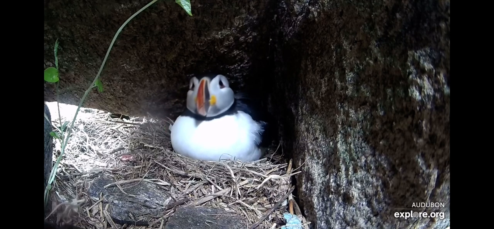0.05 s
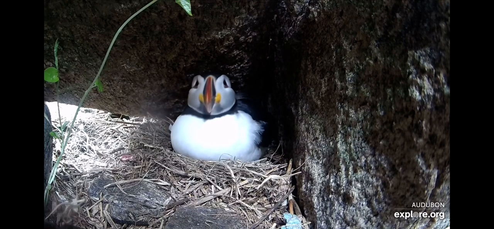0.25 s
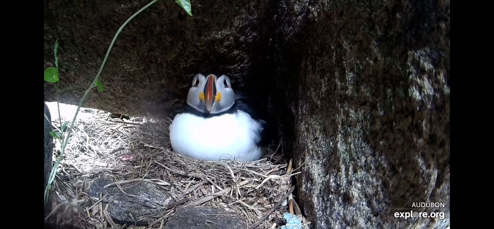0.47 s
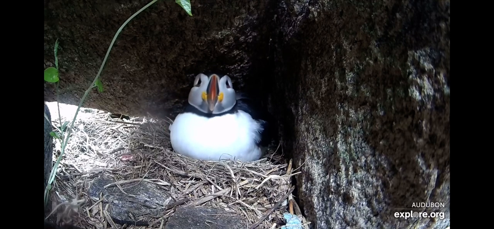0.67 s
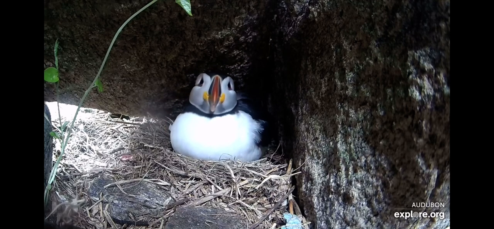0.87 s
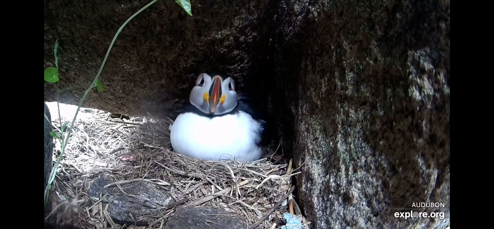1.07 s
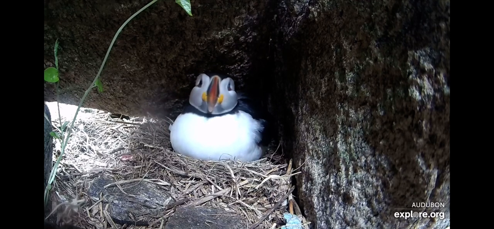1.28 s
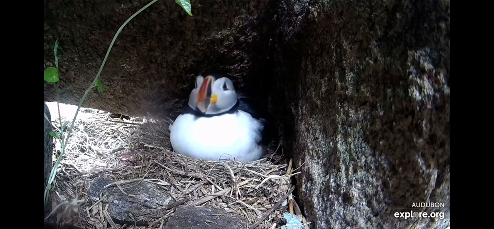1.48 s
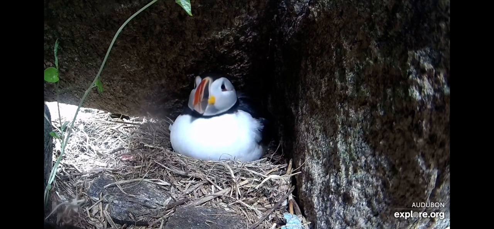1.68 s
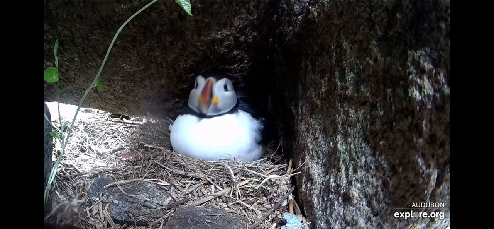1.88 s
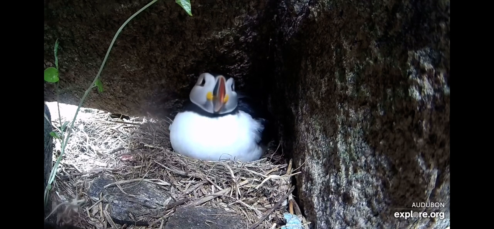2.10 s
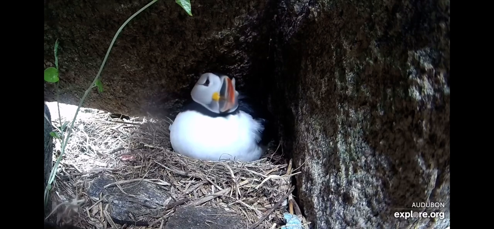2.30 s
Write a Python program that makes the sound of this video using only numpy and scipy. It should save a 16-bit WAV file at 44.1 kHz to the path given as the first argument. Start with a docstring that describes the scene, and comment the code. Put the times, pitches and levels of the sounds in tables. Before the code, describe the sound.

Harsh seabird calls, a whistle, a sinking rattle and falling rasps, over a faint distant colony.

```python
"""Seabirds outside a rock burrow

Seabirds, probably terns, call near the microphone: a clear arched whistle, a rattle that sinks in
pitch and a loud falling rasp, with fainter rasps further off. Each is a syrinx tone shaped by throat
and beak, plus air noise. Three distant rising peeps and a few soft thuds come in between. The rock
adds faint echoes and rings near 2.5 kHz; a distant colony and a low rumble lie underneath."""
import sys
import numpy as np
from scipy import signal
from scipy.fft import rfft, irfft, next_fast_len
from scipy.io import wavfile

SR = 44100
rng = np.random.default_rng(int(sys.argv[2]) if len(sys.argv) > 2 else 0)


def persist_wave(psi):
    """Save psi, clipped to +-1, as 16-bit WAV."""
    counts = np.round(np.clip(psi, -1, 1) * 32767).astype(np.int16)
    wavfile.write(sys.argv[1], SR, np.atleast_2d(counts).T)


N = 108045
T = np.arange(N) / SR


def from_db(db):
    """Decibels to gain."""
    return 10 ** (np.asarray(db) / 20)


def rms_one(x):
    """Scale to rms 1."""
    return x / np.sqrt(np.mean(x ** 2) + 1e-20)


def gain_at(spectrum, hz):
    """Gain of a spectrum at given frequencies."""
    f, db = np.transpose(spectrum)
    return from_db(np.interp(np.log(np.maximum(hz, 1)), np.log(f), db))


def noise(spectrum):
    """Coloured noise of rms 1."""
    size = next_fast_len(N, True)
    gains = gain_at(spectrum, np.fft.rfftfreq(size, 1 / SR))
    return rms_one(irfft(rfft(rng.standard_normal(size)) * gains, size)[:N])


def drift(rate, size=N):
    """Smooth random wander of spread 1."""
    pole = np.exp(-16 * np.pi * rate / SR)
    white = rng.standard_normal(size // 8 + 2000)
    slow = rms_one(signal.lfilter([1], [1, -2 * pole, pole * pole], white)[500:])
    return np.interp(np.arange(size) / 8, np.arange(len(slow)), slow)


def ease(x):
    """Quarter sine from 0 to 1, then held."""
    return np.sin(np.pi / 2 * np.clip(x, 0, 1))


def gate(t, start, end, attack, release):
    """Rounded attack, hold and release."""
    return ease((t - start) / attack) ** 2 * ease((end - t) / release) ** 2


def contour(points):
    """Times, pitch and envelope of one call."""
    s, hz, db = np.transpose(points)
    t = T[(T > s[0]) & (T < s[-1])]
    edges = gate(t, s[0], s[-1], attack=.005, release=.005)
    return t, np.interp(t, s, hz), from_db(np.interp(t, s, db)) * edges


# Response of throat and beak: f/Hz, level/dB
THROAT_RESPONSE = [(1050, -9.5), (1250, -15.5), (1450, -4.5), (1620, -4), (2030, -6), (2500, 1.5),
                   (3100, -2.5), (3700, -10), (4130, 1.5), (4500, -10.5), (5100, -1), (5450, -4),
                   (6100, 1.5), (6800, -11.5), (7500, -27.5), (8400, -26), (9500, -16.5), (11000, -20.5),
                   (13200, -13.5)]
JITTER, SHIMMER = .042, .65   # fast spread of pitch and amplitude at roughness 1


def voice(t, pitch, envelope, harmonics_db, rough, air_db, tilt_db=0, bass_db=0):
    """An unsteady syrinx sounding through the throat. Rows: tone, air noise strength, send to the tail."""
    jitter, shimmer, waver, swell = (drift(rate, SR // 2)[:len(t)] for rate in (393, 200, 70, 70))
    unsteady = np.sqrt(min(abs(np.min(rough)) / .22, 1))
    pitch = pitch * (1 + unsteady * .008 * waver)
    envelope = envelope * from_db(unsteady * 1.1 * swell)
    phase = 2 * np.pi * np.cumsum(pitch * (1 + rough * JITTER * jitter)) / SR
    k = np.arange(len(harmonics_db))[:, None] + 1
    colour_db = tilt_db * np.log2(np.maximum(k / 2, 1)) + bass_db * (k == 1)
    gains = gain_at(THROAT_RESPONSE, k * pitch) * from_db(np.array(harmonics_db)[:, None] + colour_db)
    tone = np.sum(gains * np.sin(k * phase), axis=0) / np.sqrt(np.sum(gains ** 2, axis=0) / 2)
    tone = tone * envelope * (1 + rough * SHIMMER * shimmer) / np.hypot(1, rough * SHIMMER)
    air = from_db(air_db) * envelope * np.sqrt(abs(rough))
    send = tone / envelope.max() ** .3   # fainter calls are further off and wetter
    out = np.zeros((3, N))
    out[:, np.rint(t * SR).astype(int)] = tone, air, send
    return out


# Rasps, near and further off: flutter/Hz, flutter depth/share of pitch, roughness/0-1,
# overtone tilt/dB per octave, contour [t/s, f/Hz, level/dB]
RASP_CALLS = [ (118, 0.012, 0.7, -18.5, [(-.01, 1359, -10.5), (.02, 1289, -45), (.06, 1160, -40.5)]),
              (55.1, 0.005, 0.31, 12, [(.045, 1445, -50), (.1, 1590, -39), (.122, 1661, -29.5),
              (.175, 1666, -34.5), (.22, 1560, -31.5)]), (68.9, 0.024, 0.96, 2, [(.1, 1300, -39),
              (.19, 1392, -49), (.25, 1360, -46.5), (.277, 1250, -29.5), (.3, 1304, -43),
              (.35, 1320, -42)]), (64.6, 0.047, 0.49, -7, [(.35, 1405, -33.5), (.385, 1439, -24),
              (.42, 1382, -19), (.44, 1238, -21), (.468, 1315, -21), (.495, 1284, -33)]),
              (52, 0.04, 0.5, -5, [(.97, 1395, -44.5), (1.03, 1295, -58.5), (1.05, 1227, -52),
              (1.105, 1245, -49.5), (1.125, 1140, -63), (1.15, 1018, -50), (1.19, 965, -63)]),
              (76.1, 0.0075, 0.48, 3, [(1.205, 1268, -55.5), (1.232, 1245, -53.5), (1.268, 1459, -42),
              (1.3, 1445, -47.5), (1.36, 1376, -53), (1.42, 1328, -45), (1.49, 1324, -59)]),
              (72.8, 0.0033, 0.63, 1, [(1.368, 1353, -41), (1.389, 1296, -48), (1.398, 1275, -30.5),
              (1.425, 1163, -50.5), (1.495, 1026, -45.5), (1.525, 1000, -59)]),
              (57, .02, 0.36, 11, [(1.515, 1338, -50), (1.55, 1428, -42.5), (1.565, 1442, -68),
              (1.59, 1379, -53), (1.63, 1245, -50), (1.665, 898, -53.5)]),
              (58.52, 0.024, 0.43, -0.5, [(1.772, 1414, -49.5), (1.786, 1538, -30.5), (1.82, 1643, -29.5),
              (1.875, 1660, -32), (1.925, 1674, -28.5), (1.975, 1575, -21), (2.005, 1433, -20),
              (2.022, 1286, -25.5)]), (56.6, 0.02, 0.48, -15, [(2.016, 1284, -23), (2.036, 1244, -21.5),
              (2.047, 1218, -27.5), (2.075, 1197, -22), (2.105, 1174, -29), (2.14, 1194, -20.5),
              (2.153, 1207, -45), (2.174, 1240, -26.5), (2.195, 1067, -42), (2.24, 1029, -40.5),
              (2.32, 948, -66.5)]), (59.05, 0.036, 0.57, -8.5, [(2.02, 1420, -31), (2.12, 1333, -30),
              (2.146, 1542, -55), (2.154, 1547, -19.5), (2.163, 1555, -38), (2.19, 1550, -48)]),
              (64, 0.027, 0.43, -2, [(2.275, 1190, -54), (2.295, 1303, -48), (2.315, 1300, -78),
              (2.385, 1338, -85), (2.398, 1370, -54.5), (2.45, 1324, -79.5)]), ]
# Their harmonics, fundamental first: level/dB
RASP_HARMONICS_DB = [-1, 4, -13.5, -27]


def rasps():
    """Harsh calls that flutter in little arches, each higher, louder and brighter at its top."""
    out = 0
    for rate, depth, rough, tilt_db, points in RASP_CALLS:
        t, pitch, envelope = contour(points)
        flutter_hz = rate * (1 + .2 * drift(24, SR // 2)[:len(t)])
        arch = abs(np.sin(np.pi * np.cumsum(flutter_hz) / SR))
        flutter = np.pi * arch - 2   # centred on zero
        throb = np.exp(.24 * (1300 / pitch) ** 4 * flutter)   # deeper at low pitch
        out += voice(t, pitch * (1 + depth * flutter), envelope * throb, RASP_HARMONICS_DB, rough,
                     air_db=-20.5, tilt_db=tilt_db + 3 * flutter)
    return out


# Air noise in the calls: f/Hz, level/dB
BREATH_SPECTRUM = [(300, -30), (700, -29), (1250, -6.5), (2000, -4), (2750, 6), (4100, -11), (5200, -20),
                   (6300, -18.5), (7600, -50.5), (15000, -56)]


def breath(strength):
    """Air hisses along with the voices, more in loud, rough calls."""
    return strength * noise(BREATH_SPECTRUM)


# The colony, far from the microphone: f/Hz, level/dB
COLONY_SPECTRUM = [(800, -19), (1200, -10.5), (1600, -10), (2650, -1.5), (3900, -20.5), (5000, -32.5),
                   (15000, -39)]


def colony(level_db=-60, swing_db=2):
    """Distant birds blur into a wavering wash of noise."""
    return from_db(level_db + swing_db * drift(15)) * noise(COLONY_SPECTRUM)


# Low background at the burrow: f/Hz, level/dB
RUMBLE_SPECTRUM = [(20, -10.5), (50, -1.5), (75, 4), (130, 2), (180, -5), (550, -24), (3000, -40.5)]
# Its swells: t/s, level/dB
RUMBLE_SWELLS = [(.14, -62.5), (.2, -51), (.3, -63), (.55, -58), (.76, -53), (.87, -63.5), (1.5, -67.5),
                 (1.9, -58), (2.25, -62.5)]


def rumble():
    """Low noise that swells and sinks."""
    return from_db(np.interp(T, *np.transpose(RUMBLE_SWELLS))) * noise(RUMBLE_SPECTRUM)


# The clear whistle, near the microphone: t/s, f/Hz, level/dB
WHISTLE_CONTOUR = [(.153, 1633, -36), (.172, 1940, -19), (.195, 2020, -33), (.222, 2040, -19.5),
                   (.255, 2050, -20), (.283, 1987, -20.5), (.303, 1880, -22.5), (.311, 1840, -38),
                   (.32, 1810, -22), (.328, 1780, -35), (.339, 1760, -26), (.348, 1700, -37.5)]
# Its harmonics, fundamental first: level/dB
WHISTLE_HARMONICS_DB = [2, -1, -15, -29, -30.5]


def whistle():
    """One arched note, clean at its top and hoarser the further it slides down."""
    t, pitch, envelope = contour(WHISTLE_CONTOUR)
    rough = .04 + 3 * (1 - pitch / pitch.max())
    return voice(t, pitch, envelope, WHISTLE_HARMONICS_DB, rough, air_db=-12)


# Notes of the nearby rattle: t/s, length/s, f/Hz, level/dB, pitch sag/Hz per s
RATTLE_NOTES = [(0.346, 0.032, 1549, -16.5, 1200), (0.373, 0.036, 1584, -14.5, 1530),
                (0.403, 0.034, 1575, -17, 1590), (0.437, 0.033, 1566, -17, 1830),
                (0.471, 0.028, 1576, -17, 2024), (0.502, 0.029, 1571, -19.5, 2200),
                (.533, 0.032, 1566, -21, 2180), (.565, 0.029, 1548, -21.5, 2393),
                (.597, .031, 1546, -20, 2930), (.630, 0.03, 1504, -18.5, 2670),
                (0.66, 0.028, 1463, -15.5, 2830), (0.691, 0.028, 1386, -17.5, 5000),
                (0.724, 0.022, 1259, -18, 7800), (0.752, 0.03, 1193, -23, 10320),
                (0.784, 0.03, 1166, -27.5, 9400), (0.815, 0.031, 1145, -31.5, 7400),
                (0.846, 0.03, 1139, -34, 10150), (0.88, 0.02, 1434, -32.5, 545),
                (0.91, 0.015, 1490, -34.5, 3060), (0.933, 0.036, 1409, -39.5, 3580)]
# Their harmonics, fundamental first: level/dB
RATTLE_HARMONICS_DB = [-2, 3, -12, -25.5, -29.5, -28, -38, -43]
NOTE_ARCH_HZ, LOWEST_HZ, STEEP_SAG_HZ_PER_S = 59.4, 1104, 6200


def rattle():
    """About thirty notes a second, each flicking up and sagging; the steep ones are yelps."""
    out = 0
    for start, length, hz, db, sag in RATTLE_NOTES:
        t = T[(T > start) & (T < start + length)]
        along = (t - start) / length - .5
        arch = np.sin(np.pi * np.sqrt(along + .5)) - 2 / np.pi
        pitch = np.maximum(hz - sag * length * along + NOTE_ARCH_HZ * arch, LOWEST_HZ)
        steep = sag / STEEP_SAG_HZ_PER_S
        sink = steep ** 2 * along   # a steep note fades and sinks into its fundamental
        envelope = from_db(db - 1.5 * sink) * gate(t, start, start + length, attack=.0087, release=.0073)
        out += voice(t, pitch, envelope, RATTLE_HARMONICS_DB, rough=.22 + .2 * steep ** 2,
                     air_db=-13.5, tilt_db=-2 * steep, bass_db=12 * sink)
    return out


# Soft thuds, dry at the microphone: t/s, level/dB
THUDS = [(0.475, -47), (2.034, -47), (2.057, -43.5), (2.109, -43)]


def thuds(hz=338, t60_s=.032):
    """Each dull thud is one low tone that dies quickly."""
    out = np.zeros(N)
    for start, db in THUDS:
        age = np.clip(T - start, 0, 1)
        out += from_db(db - 60 * age / t60_s) * np.sin(2 * np.pi * hz * age)
    return out


# Peeps, far from the microphone: t/s, length/s, level/dB
FAR_PEEPS = [(0.979, 0.06, -49), (1.578, 0.062, -41.5), (2.158, 0.0733, -42.5)]


def peeps(from_hz=3030, to_hz=3618):
    """Distant wavering notes that rise and level off."""
    out = np.zeros(N)
    for start, length, db in FAR_PEEPS:
        glide = from_hz + (to_hz - from_hz) * ease((T - start) / length)
        pitch = glide * (1 + .015 * drift(290))
        envelope = from_db(db) * gate(T, start, start + length, attack=.043, release=.032)
        out += envelope * np.sqrt(2) * np.sin(2 * np.pi * np.cumsum(pitch) / SR)
    return out


# Echo off the nearby rock: delay/s, level/dB
ROCK_ECHOES = [(.0052, -17.5)]


def burrow(direct, send, tail_db=-23.5, t60_s=.25):
    """The rock returns a near echo and a faint dying tail."""
    age = T[:SR // 2]
    decay = rng.standard_normal(len(age)) * from_db(-60 * age / t60_s)
    tail = signal.fftconvolve(send, decay / np.linalg.norm(decay))[:N]
    echo = sum(from_db(db) * np.interp(T - delay, T, direct, left=0) for delay, db in ROCK_ECHOES)
    return direct + echo + from_db(tail_db) * tail


# Resonances of the hollow round the microphone: f/Hz, width/Hz, level/dB
HOLLOW_MODES = [(2303, 32, 0.5), (2552, 102, 4.5), (2617, 61, -7)]


def hollow(x):
    """The hollow rings, so a call flares as its second harmonic falls through the resonances."""
    return x + sum(from_db(db) * signal.lfilter(*signal.iirpeak(hz, hz / width, fs=SR), x)
                   for hz, width, db in HOLLOW_MODES)


def scene():
    """One microphone among the rocks: the callers over the colony and the rumble."""
    tone, air, send = rasps() + whistle() + rattle()
    far_peeps = peeps()
    birds = tone + breath(air) + far_peeps
    far_colony, low_rumble = colony(), rumble()
    echoing_birds = burrow(birds, send + 6 * far_peeps)
    return (hollow(echoing_birds + far_colony) + low_rumble + thuds())[None]


def record(dry, cutoff_hz=15700):
    """The top is cut steeply."""
    return signal.sosfilt(signal.cheby2(12, 70, cutoff_hz, fs=SR, output="sos"), dry)


dry = scene()
out = record(dry)
persist_wave(out)
```